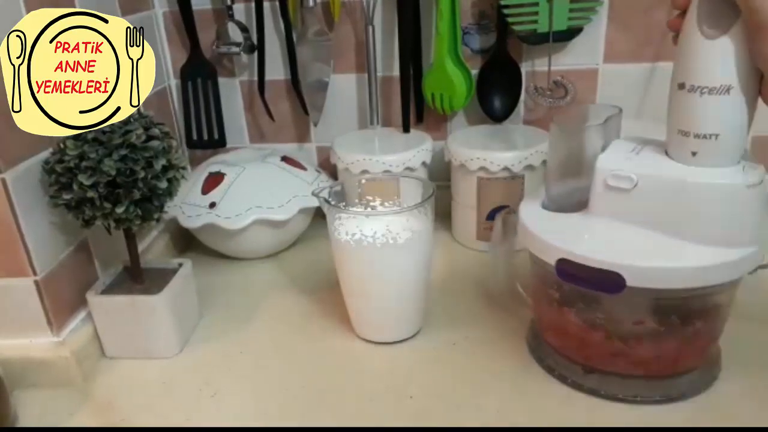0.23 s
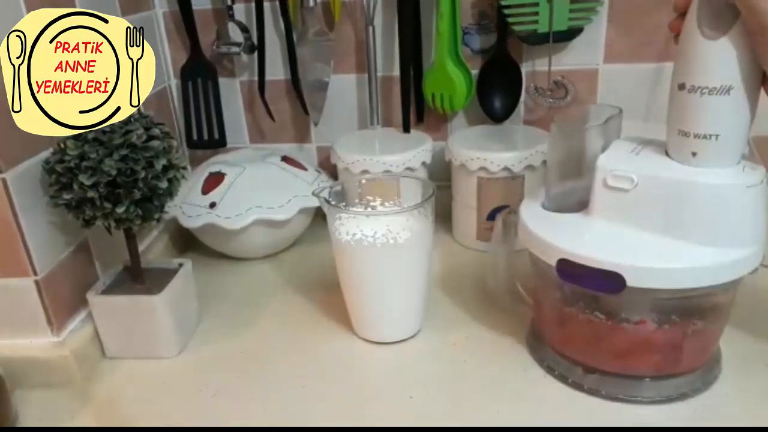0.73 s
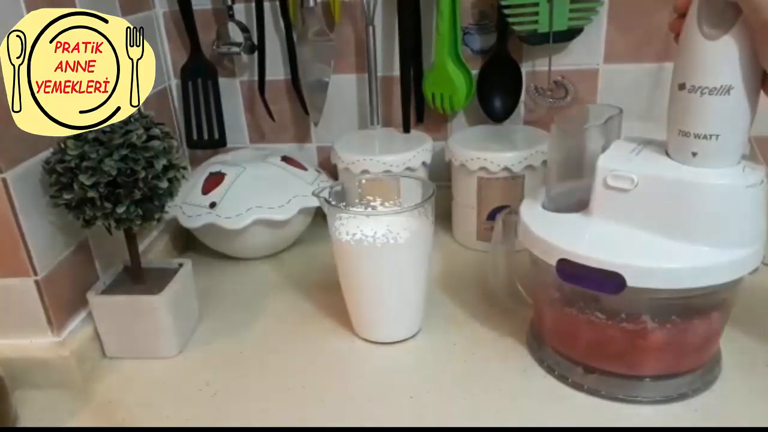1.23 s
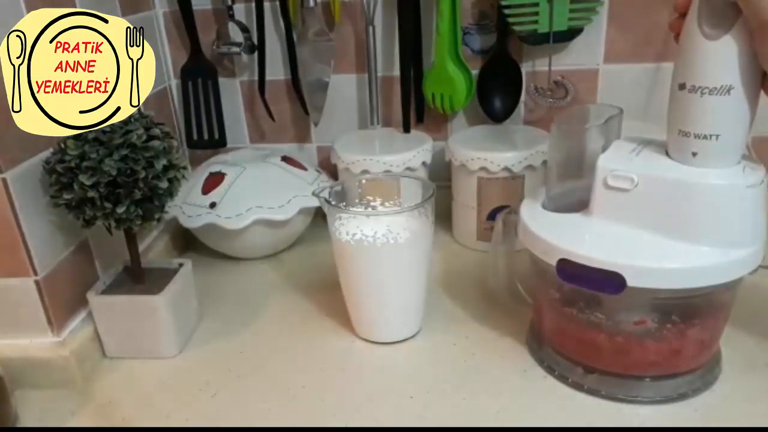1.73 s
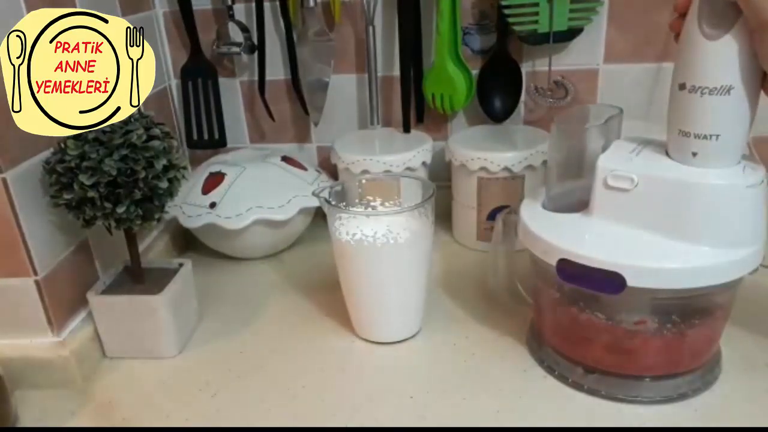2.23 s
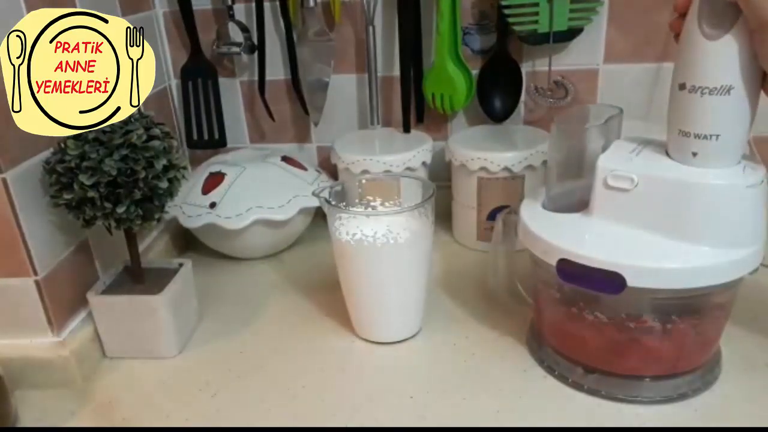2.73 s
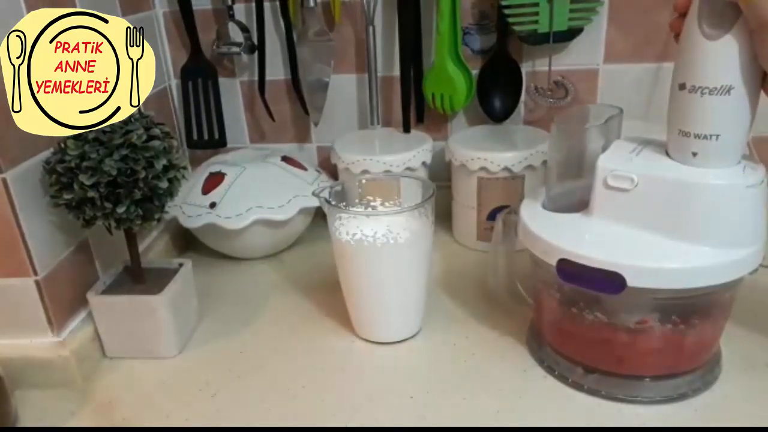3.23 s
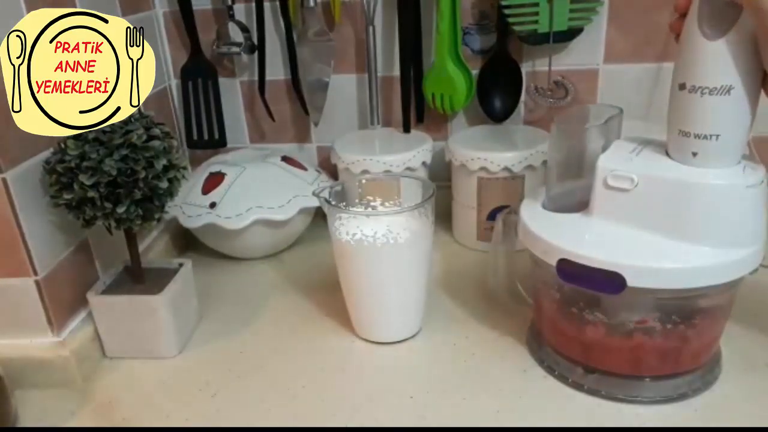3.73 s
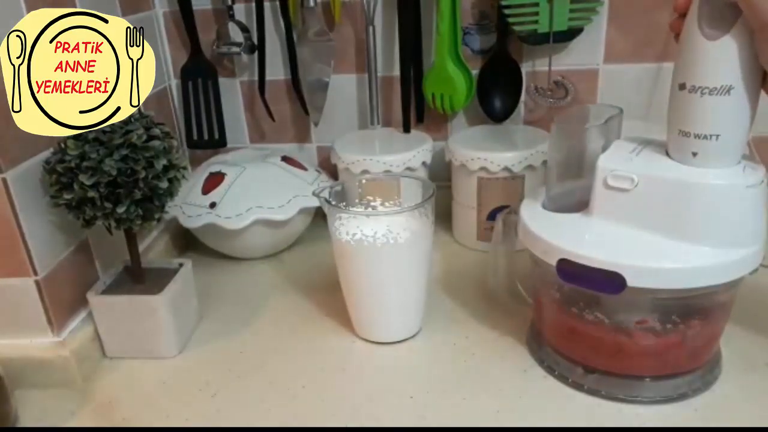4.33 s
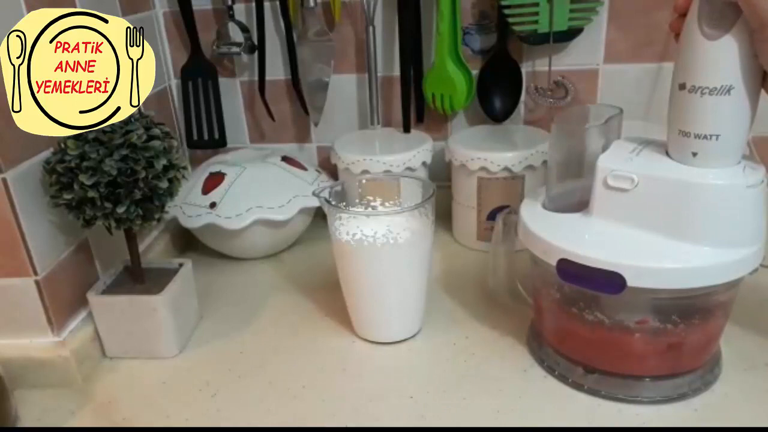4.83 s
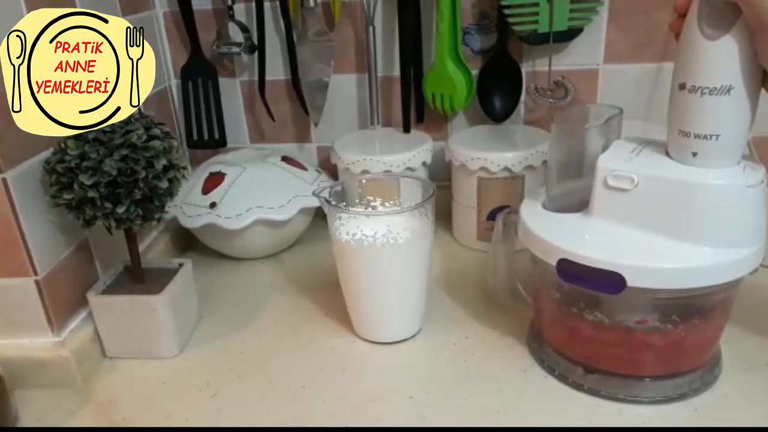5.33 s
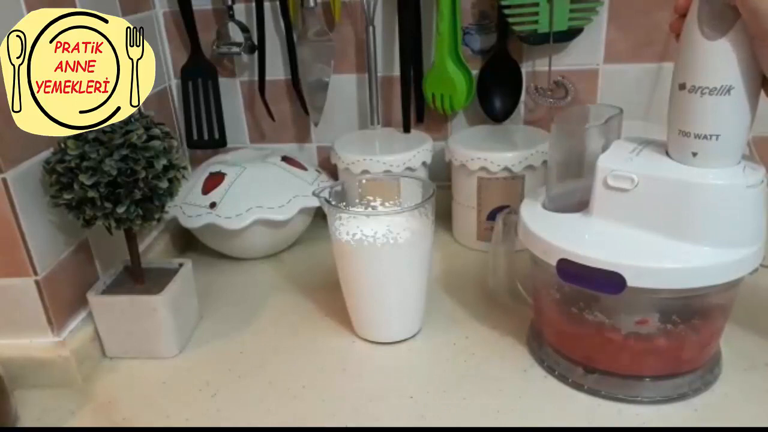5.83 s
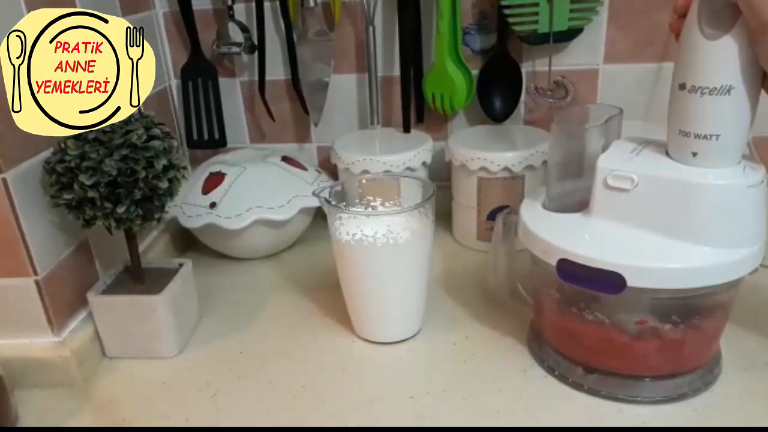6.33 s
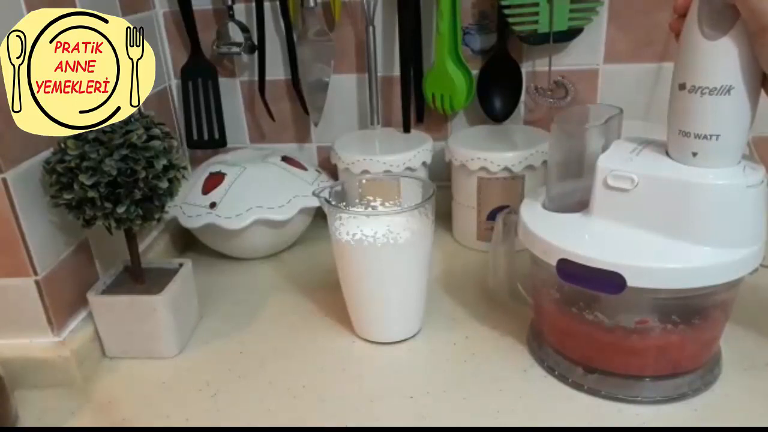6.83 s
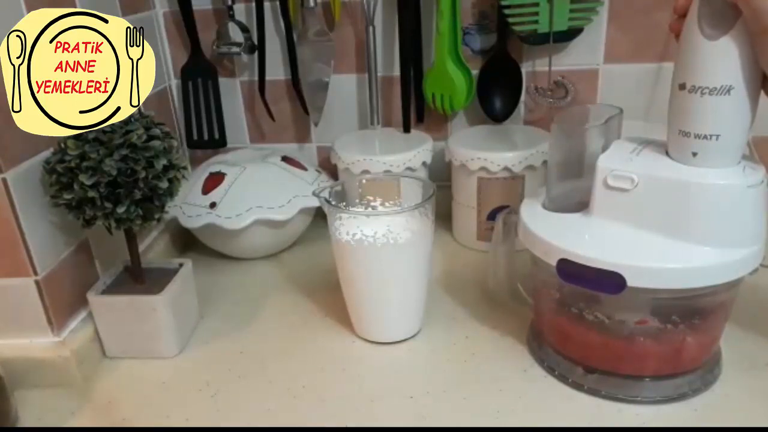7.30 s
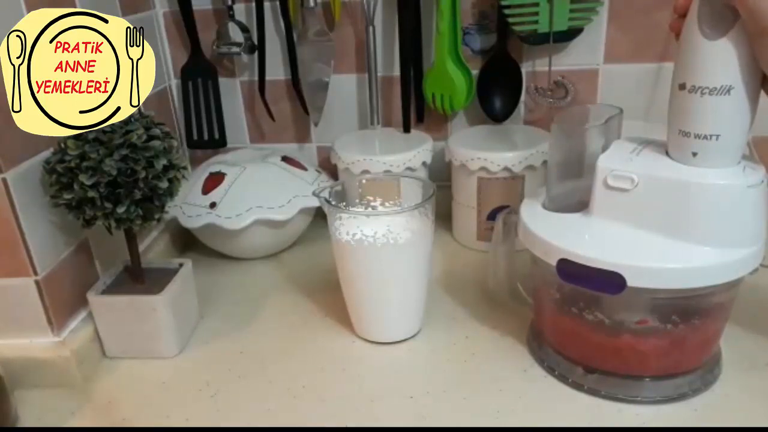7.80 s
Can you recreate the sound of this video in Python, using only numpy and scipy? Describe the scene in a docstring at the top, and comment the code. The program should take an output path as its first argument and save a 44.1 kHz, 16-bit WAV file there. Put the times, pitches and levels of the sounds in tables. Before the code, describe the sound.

Close by on a kitchen counter, a hand blender crushes frozen fruit in a plastic bowl, switched on ten times. Three short jabs lead to one long stretch, three medium runs and three more jabs. Each time the motor leaps to a loud, whining whir and briefly coasts down. Hard chattering gradually gives way to smoother, slushy grinding, with a brief ring from the tiled room.

```python
"""Hand blender crushing frozen strawberries

A hand blender on a plastic chopper bowl crushes frozen strawberries with sugar on a kitchen counter.
Ten presses of the switch: the mains motor leaps up to speed, hums and hisses, its gears whine, the
blades grind, and it coasts down. The coupling chatters less as the fruit softens to pulp.
The tiled kitchen rings briefly, and a fast gain control holds the loud parts at one level."""
import sys
import numpy as np
from scipy import signal
from scipy.fft import rfft, irfft, next_fast_len
from scipy.io import wavfile
from scipy.ndimage import uniform_filter1d

SR = 44100
rng = np.random.default_rng(int(sys.argv[2]) if len(sys.argv) > 2 else 0)


def persist_wave(psi):
    """Save psi, clipped to +-1, as 16-bit WAV."""
    counts = np.round(np.clip(psi, -1, 1) * 32767).astype(np.int16)
    wavfile.write(sys.argv[1], SR, np.atleast_2d(counts).T)


N = 355534
TIME = np.arange(N) / SR
BINS = np.fft.rfftfreq(8192, 1 / SR)
MAINS_HZ = 50

# room tone of the quiet kitchen: frequency_hz, colour_db
ROOM_TONE = [(20, -7), (100, -9.5), (250, -4.5), (600, -16.5), (1500, -24.5), (4000, -28.5), (15000, -36)]
# reverb of the tiled kitchen: frequency_hz, t60_s
REVERB_TIMES = [(150, 0.34), (1200, 0.33), (4000, 0.23), (12000, 0.31)]
# a hand slides over the plastic: time_s, level_db
HAND_SLIDE = [(0, -46.5), (.035, -56), (.07, -64), (.1, -71.5), (.17, -65), (.2, -65), (.24, -54),
              (.26, -100)]
# light knocks on the bowl while the motor rests: start_s, level_db, centre_hz, decay_s
BOWL_KNOCKS = [(0.038, -42.5, 1670, 0.013), (.066, -53, 280, 0.018), (.118, -55, 199, .025),
               (3.931, -54.5, 3020, 0.0043), (3.933, -48.5, 600, 0.0077)]
# resonances of bowl and lid: pitch_hz, width_hz, lift_db
BOWL_MODES = [(217, 16, 1), (251, 26, 7), (304, 6.5, 0.5), (372.4, 16, 3.5), (492, 71, 3.5),
              (617.6, 67, 10), (751.5, 39, 8.5), (846, 49, 5), (1026, 64, 7.5), (1107, 22, 6.5),
              (1070, 23, -0.5), (1358, 85, 7.5), (1445, 70, 4), (2230, 51, 7), (3130, 73, 4.5),
              (4360, 200, 1.5)]
# magnetic hum of the coils: mains_multiple, level_db
HUM_PARTIALS = [(2, -39.5), (4, -17.5), (6, -33.5)]
# hiss of the carbon brushes: frequency_hz, colour_db
BRUSH_COLOUR = [(500, -29), (3000, -13.5), (5600, 0), (6080, 12.5), (6500, -11.5), (8100, -12.5),
                (8650, 8.5), (8980, 14.5), (9450, 5.5), (10500, 5.5), (12300, -7.5), (15800, -56)]
# the driving torque shakes bowl and counter: frequency_hz, colour_db
SHAKE_COLOUR = [(60, -40.5), (150, -11), (195, -5), (260, -2), (330, -4), (420, -7), (700, -23),
                (4000, -51.5)]
# the coupling chatters against hard fruit and rings the lid: frequency_hz, colour_db
CHATTER_COLOUR = [(200, -30.5), (850, -21.5), (1050, -2.5), (1190, -15), (1385, -4.5), (1530, -5),
                  (1750, -14), (3500, -24.5), (12000, -37)]
# gear and commutator tones: speed_multiple, base_db, throb_depth (0-1), coasting_change_db
# (half the change is added to the base while driven, one and a half times it while coasting)
GEAR_TONES = [(6, -20, 0.87, 1), (9, -24.5, 0.01, -10.5), (12, -27.5, 1, 2.5), (24, -30.5, 0.9, -10),
              (36, -41.5, 0.2, -13)]
# how strongly the housing radiates those tones: frequency_hz, gain_db
HOUSING_EQ = [(400, -16.5), (900, -10.5), (1100, 3), (1380, -4), (1490, -4), (1585, 4.5), (1850, -2),
              (2250, 1.5), (2800, -12.5), (2960, -4.5), (3085, 3), (3400, -1.5), (5750, -3), (6060, 3),
              (7500, -15), (9000, -1)]
# broad colour of the grinding: frequency_hz, colour_db
GRIND_COLOUR = [(30, -24.5), (60, -22.5), (90, -1.5), (150, -8), (240, -2.5), (420, -2.5), (680, -7.5),
                (1250, 2), (1800, -3.5), (2700, 1.5), (3600, -2), (5300, -5), (7600, -13), (15500, -20.5)]
# switch presses: on_s, off_s, slack_s (until the coupling bites), jolt_db, drag (1 = usual), whine_db
SWITCH_PRESSES = [(.243, 0.446, 0.024, -32, 1, -4.5), (0.565, 0.74, .013, -23, 0.47, 3.5),
                  (.87, 1.037, 0.013, -24, 1.2, 2), (1.248, 3.615, 0.017, -30, 0.97, 2.5),
                  (4.058, 4.998, 0.0057, -29, 1.15, 3.5), (5.215, 5.74, 0.013, -19, 0.93, 4),
                  (6.05, 6.89, 0.017, -17, 1.1, 4.5), (7.369, 7.579, 0.017, -11.5, 0.72, 4),
                  (7.651, 7.84, 0.0044, -13, 0.69, 3.5), (7.908, 8.201, .011, -19, 0.81, 4)]


def amp(db):
    """Decibels to gain."""
    return 10 ** (np.asarray(db) / 20)


def unit(x):
    """Scales to rms 1."""
    return x / np.sqrt(np.mean(x ** 2) + 1e-20)


def noise():
    """White noise."""
    return rng.standard_normal(N)


def spectrum(points, hz=BINS):
    """Joins breakpoints on a log-frequency axis."""
    point_hz, value = np.transpose(points)
    return np.interp(np.log(hz + 1), np.log(point_hz + 1), value)


def automation(rows):
    """One curve in time for each column after the first, which holds seconds."""
    time_s, *columns = np.transpose(rows)
    return [np.interp(TIME, time_s, column) for column in columns]


def eq(x, gain_db):
    """Minimum-phase filter with the given gain in each bin."""
    log_gain = np.log(amp(np.r_[gain_db, gain_db[-2:0:-1]]))
    taps = np.fft.ifft(np.exp(np.conj(signal.hilbert(log_gain)))).real
    return signal.oaconvolve(x, taps[:len(gain_db)])[:N]


def wander(rate_hz):
    """Random motion of rms 1, mostly slower than rate_hz."""
    n = next_fast_len(N, True)
    hz = np.fft.rfftfreq(n, 1 / SR)
    return unit(irfft(rfft(rng.standard_normal(n)) / (1 + (hz / rate_hz) ** 2), n)[:N])


def burst(start_s, decay_s):
    """An envelope that jumps up and dies away."""
    return (TIME >= start_s) * np.exp(-np.clip((TIME - start_s) / decay_s, 0, 20))


def room_tone(level_db=-66):
    """The quiet kitchen: a faint, dark bed of noise."""
    return amp(level_db) * unit(eq(noise(), spectrum(ROOM_TONE)))


def kitchen_reverb(x, echoes_per_s=3000, predelay_s=.003):
    """Dense reflections from tiles and counter, each band dying at its own speed."""
    echoes = rng.choice([-1., 1.], SR) * (rng.random(SR) < echoes_per_s / SR) * (TIME[:SR] > predelay_s)
    hz, t, bands = signal.stft(echoes, SR, nperseg=256)
    decay = amp(-60 * t / spectrum(REVERB_TIMES, hz)[:, None])
    tail = signal.istft(bands * decay, SR, nperseg=256)[1]
    return signal.oaconvolve(x, tail / np.linalg.norm(tail))[:N]


def swirling_reverb(x, swirl_hz=5., paths=4):
    """Churning fruit strikes all round the bowl, so the sound takes ever-changing paths in the room."""
    sends = [np.sqrt(2 / paths) * np.cos(np.pi * (swirl_hz * TIME + k / paths)) for k in range(paths)]
    return sum(kitchen_reverb(x * send) for send in sends)


def handling():
    """A hand takes hold of the blender; soft knocks sound in the resting bowl."""
    rub_db = spectrum([(200, -12.5), (1300, -5), (4000, -7.5), (9000, -4.5), (15000, -11.0)])
    out = amp(automation(HAND_SLIDE)[0]) * unit(eq(noise(), rub_db))
    for start_s, level_db, centre_hz, decay_s in BOWL_KNOCKS:
        band_db = -10 * np.log10(1 + (1.5 * np.log2((BINS + 1) / centre_hz)) ** 4)
        out += amp(level_db) * burst(start_s, decay_s) * unit(eq(noise(), band_db))
    return out


def in_bowl(x, colour):
    """Gives blows inside the bowl a broad colour and its ringing modes, at unit power gain."""
    modes_db = sum(lift / (1 + (2 * (BINS - hz) / width) ** 2) for hz, width, lift in BOWL_MODES)
    gain_db = spectrum(colour) + modes_db
    return eq(x, gain_db - 10 * np.log10(np.mean(amp(gain_db) ** 2)))


def coil_hum(waver=.31):
    """The field coils shake the housing at even multiples of the mains frequency."""
    out = np.zeros(N)
    for multiple, level_db in HUM_PARTIALS:
        level = amp(level_db) * np.sqrt(2) * (1 + waver * wander(8.6))
        out += level * np.sin(2 * np.pi * (multiple * MAINS_HZ * TIME + rng.random()))
    return out


def brush_hiss(current, throb=.26):
    """Carbon brushes scrape the commutator and spark on each half wave of the mains."""
    sparks = 1 + throb * current * np.cos(4 * np.pi * MAINS_HZ * TIME)
    return unit(eq(noise() * sparks, spectrum(BRUSH_COLOUR)))


def coupling_chatter(speed_hz, uneven_db=3.):
    """The coupling takes a rough knock at each blade pass, twice in four motor turns."""
    passes = np.cumsum(speed_hz) / SR / 2
    knocks = np.exp(np.cos(2 * np.pi * passes + wander(30))) * amp(-uneven_db * wander(40))
    return in_bowl(unit(knocks * noise()), CHATTER_COLOUR)


def gear_whine(speed, full_hz, current, flutter=.002, shimmer=.38, rattle_hz=90.):
    """Tooth tones: the torque throbs twice a mains cycle; backlash roughens each tone."""
    turns = np.cumsum(speed * full_hz * (1 + flutter * wander(25.7))) / SR
    throb = current * np.cos(4 * np.pi * MAINS_HZ * TIME)
    rattle = .32 + .33 * (1 - current)  # looser when coasting
    out = np.zeros(N)
    for multiple, base_db, throb_depth, coasting_change_db in GEAR_TONES:
        phase = 2 * np.pi * (multiple * turns + rng.random())
        tone = np.cos(phase) * (1 + shimmer * wander(23)) * (1 + throb_depth * throb)
        backlash = np.cos(phase) * wander(rattle_hz) + np.sin(phase) * wander(rattle_hz)
        out += amp(base_db + coasting_change_db * (1.5 - current)) * (tone + rattle * backlash)
    # the teeth stop singing once the motor has lost a third of its speed
    singing = speed ** 8 / np.hypot(speed ** 8, .66 ** 8)
    return eq(out * speed ** 1.4 * singing, spectrum(HOUSING_EQ))


def crushing(speed_hz, chips_per_s=2200, spread_db=2.5, sweep_depth=.088, gear_ratio=4.):
    """Ice chips and sugar pelt the wall over a wash of slush, in surges as the two blades sweep round."""
    sizes = amp(spread_db * np.minimum(rng.exponential(1, N), 5))
    chips = unit(sizes * rng.choice([-1, 1], N) * (rng.random(N) < chips_per_s / SR))
    blade_turns = np.cumsum(speed_hz) / SR / gear_ratio
    surge = 1 + sweep_depth * np.cos(4 * np.pi * blade_turns + wander(20))
    lumps = amp(wander(56))
    slush = noise()
    return unit((chips + slush) * surge * lumps)


def fruit_hardness(soften_s=1.4):
    """The fruit softens for as long as the motor is driven: 1 is frozen, 0 is pulp."""
    driven_s = sum(np.clip(TIME - on_s, 0, off_s - on_s) for on_s, off_s, *_ in SWITCH_PRESSES)
    return np.exp(-driven_s / soften_s)


def fruit_load(hardness, free_hz=255.8, pulp_sag_hz=6.5, ice_sag_hz=15, pulp_db=-28, ice_db=-9.5):
    """Hard fruit and stray lumps slow the motor and rattle the coupling; lumps also duck the whine."""
    drag, whine_db = automation([(time_s, drag, db) for on_s, off_s, _, _, drag, db in SWITCH_PRESSES
                                 for time_s in (on_s, off_s)])
    lumps = wander(2.506)
    full_hz = free_hz - drag * (pulp_sag_hz + ice_sag_hz * hardness) - .5 * lumps
    chatter_db = pulp_db + (ice_db - pulp_db) * hardness + 4 * lumps
    return full_hz, whine_db - 1.5 * lumps, chatter_db


def motor(spin_up_s=.075, stall_torque=15., coast_s=.14, slack_db=-7):
    """The motor spins up and coasts; returns its speed, its current and the coupling's grip, each 0-1."""
    speed, current, grip = np.zeros(N), np.zeros(N), np.ones(N)
    for on_s, off_s, slack_s, *_ in SWITCH_PRESSES:
        start = round(on_s * SR)
        t = TIME[start:]
        # a series motor pulls hardest when slow, and creeps up the last few percent
        shortfall = 1 - speed[start]
        lag = shortfall / (1 + stall_torque * shortfall)
        lag = lag * np.exp(-(np.minimum(t, off_s) - on_s) / spin_up_s)
        coasting = np.exp(-np.maximum(t - off_s, 0) / coast_s)
        speed[start:] = (1 - lag / (1 - stall_torque * lag)) * coasting
        current[start:] = t < off_s
        grip[start:] = np.where(t < on_s + slack_s, amp(slack_db), 1)
    return np.clip(speed, 0, 1), uniform_filter1d(current, size=200), grip


def blender(crush_db=-13, brush_db=-26, shake_db=-21.5, click_db=-34, ice_crush_db=-2.5, ice_hum_db=-5):
    """Noises and tones swell with the speed; each start adds a switch click and a jolt of the blades."""
    speed, current, grip = motor()
    hardness = fruit_hardness()
    full_hz, whine_db, chatter_db = fruit_load(hardness)
    speed_hz = speed * full_hz
    hits = sum(amp(click_db) * burst(on_s, decay_s=.0013)
               + amp(jolt_db) * burst(on_s + slack_s, decay_s=.03)
               for on_s, _, slack_s, jolt_db, *_ in SWITCH_PRESSES)
    # while the fruit is still frozen there is less slush to churn, and the hum is weaker
    bite = amp(crush_db + ice_crush_db * hardness) * grip * speed ** 3.12
    grind = in_bowl(crushing(speed_hz) * (bite + hits), GRIND_COLOUR)
    whine = amp(whine_db) * gear_whine(speed, full_hz, current)
    chatter = amp(chatter_db) * speed ** 7 * coupling_chatter(speed_hz)
    hiss = amp(brush_db) * speed ** 3.7 * brush_hiss(current)
    # shaking and hum stop with the current
    shake = amp(shake_db) * current * speed * in_bowl(noise(), SHAKE_COLOUR)
    hum = amp(ice_hum_db * hardness) * current * speed ** 7.2 * coil_hum()
    return grind + grip * (chatter + hiss + shake), grip * (whine + hum)


def scene(noise_send_db=-4, tone_send_db=-9):
    """Blender and hand in the quiet kitchen, in mono."""
    noises, tones = blender()
    noises = noises + handling()
    reverb = amp(noise_send_db) * swirling_reverb(noises) + amp(tone_send_db) * kitchen_reverb(tones)
    return (noises + tones + reverb + room_tone())[None]


def record(dry, threshold_db=-18, strength=.93, release_db_per_s=91, trim_db=-1.47, ceiling=.48):
    """Fast gain control levels the motor; then a soft clip and a steep high cut."""
    power_db = 10 * np.log10(abs(uniform_filter1d(dry[0] ** 2, size=500)) + 1e-12)
    release_db = TIME * release_db_per_s
    held_db = np.maximum.accumulate(power_db + release_db) - release_db
    over_db = np.maximum(held_db - threshold_db, 0)
    loud_s = np.cumsum(over_db > 0) / SR
    settle_db = 2 * np.exp(-loud_s / .89)  # a slow stage gives up 2 dB as the loud time adds up
    levelled = dry * amp(trim_db + settle_db - strength * uniform_filter1d(over_db, size=200))
    rounded = levelled / (1 + (levelled / ceiling) ** 4) ** .25
    high_cut = signal.firwin(511, cutoff=15720, window=("kaiser", 9), fs=SR)
    return signal.oaconvolve(rounded, high_cut[None], "same")


dry = scene()
out = record(dry)
persist_wave(out)
```